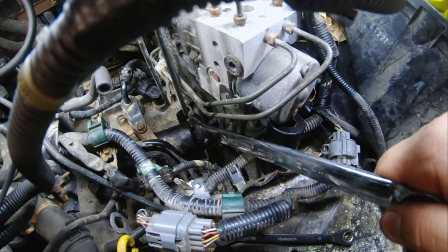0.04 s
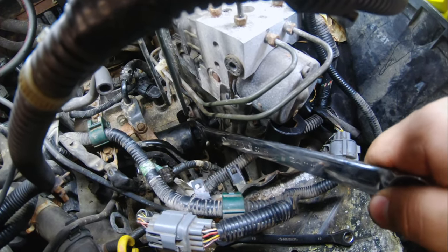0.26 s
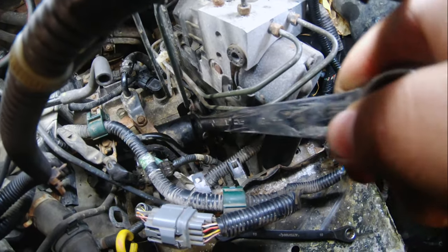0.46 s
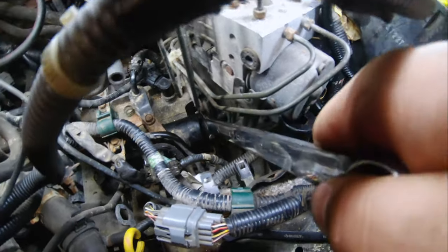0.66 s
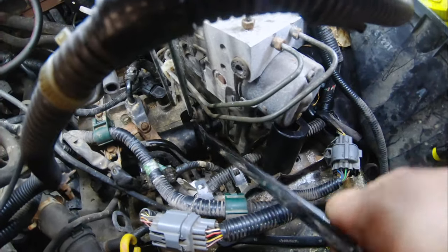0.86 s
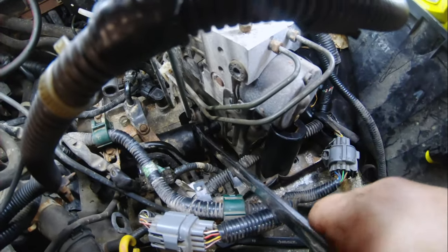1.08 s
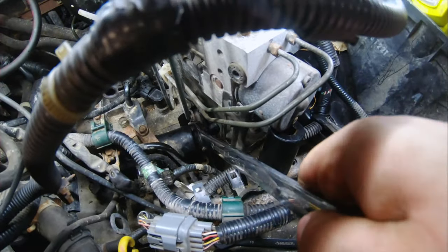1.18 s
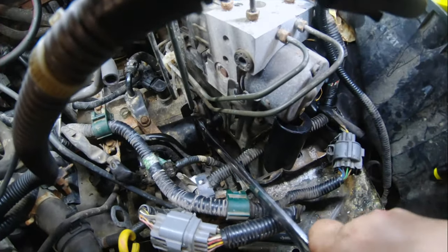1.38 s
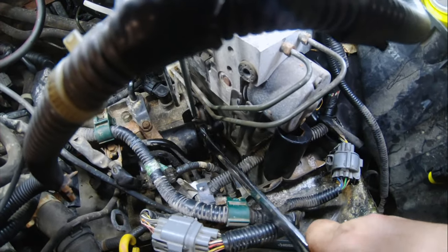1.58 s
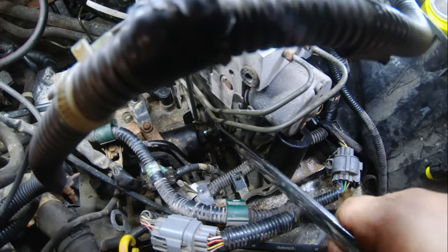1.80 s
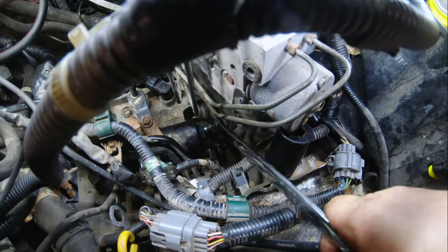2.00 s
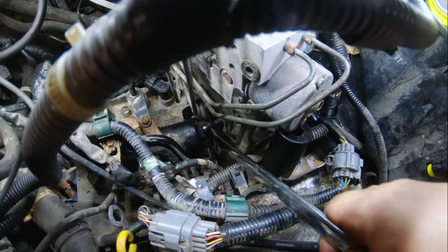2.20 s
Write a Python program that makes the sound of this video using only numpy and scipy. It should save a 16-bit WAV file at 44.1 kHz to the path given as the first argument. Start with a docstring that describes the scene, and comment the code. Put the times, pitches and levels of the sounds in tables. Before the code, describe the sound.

A wrench works a nut in a cramped engine bay, close up. Dry clicks at 0.2 and 0.3 s, a faint tick at 0.5. At 0.57-0.71 a hand bumps and rubs the microphone: deep thump, two loud hollow taps. Short scrape and double clack with dull knock around 1.0; rattling clack at 1.4, faint taps after. Brightest ringing clatter at 1.8-1.95, then quiet air and a faint tick near 2.17.

```python
"""Wrench on a nut in a cramped engine bay

A steel wrench clicks, clatters and slides on a nut: contacts are damped noise bursts, sliding is grainy noise.
Some blows ring the wrench or a metal pipe, or thud into panels: these are sums of decaying sine modes.
A hand bumps, rubs and taps the hand-held microphone, over low rumble, quiet air and a dying earlier clank.
The bay adds a short tail and the space around it a faint long one, both by convolution with decaying noise."""
import sys
import numpy as np
from scipy import signal
from scipy.fft import rfft, irfft
from scipy.io import wavfile
from scipy.ndimage import uniform_filter1d

SR = 44100
rng = np.random.default_rng(int(sys.argv[2]) if len(sys.argv) > 2 else 0)


def log_audio(samples):
    """Write samples as a 16-bit WAV file to the path given in sys.argv[1]."""
    # one column per channel
    frames = np.atleast_2d(samples).T
    # limit to full scale, then quantise
    limited = np.clip(frames, -1, 1)
    pcm = np.round(limited * 32767).astype(np.int16)
    wavfile.write(sys.argv[1], SR, pcm)


N = 99225
TIME = np.arange(N) / SR

# Spectrum of the quiet air: (frequency [Hz], relative level [dB])
AIR_TONE = [(18, -26), (30, -14), (319, -7), (486, -15), (2120, -13), (8520, -27.5), (16000, -43.5)]
# Reflections in the engine bay: (frequency [Hz], level [dB], T60 [s])
BAY_TAIL = [(155, -12.5, 0.16), (650, -2.5, 0.24), (2000, -9, 0.098), (10300, -8, 0.096)]
# Reflections in the space around it: (frequency [Hz], level [dB], T60 [s])
SPACE_TAIL = [(150, -19, 0.81), (600, -19, 0.62), (1985, -17, 0.57), (9000, -19, 0.53)]
# Course of the handling rumble before panning: (time [s], level [dB])
RUMBLE_LEVEL = [(.1, -86), (.48, -76), (.55, -38.5), (.583, -24.5), (.61, -35), (.73, -38), (.8, -53),
                (.93, -65), (1.34, -75), (1.41, -36), (1.55, -59.5), (1.66, -75.5)]
# Spectrum of the rumble: (frequency [Hz], relative level [dB])
RUMBLE_TONE = [(20, -2.5), (45, 1.5), (90, -2.5), (220, -12), (900, -48), (3000, -88)]
# The hand bumps the microphone as it lands and as it leaves: (time [s], level [dB])
BUMPS = [(0.5727, -6), (0.712, -36)]
# Skin rubbing the microphone, before grain and panning: (time [s], level [dB])
RUB_LEVEL = [(.556, -42), (.563, -40), (.569, -45), (.573, -26), (.579, -40), (.585, -31), (.591, -15.5),
             (.601, -20), (.613, -26.5), (.706, -28), (.738, -39.5), (.755, -61)]
# Spectrum of the rubbing: (frequency [Hz], relative level [dB])
RUB_TONE = [(180, -60), (300, -18), (978, -18), (1610, -3.5), (2700, -15.5), (3130, -12), (8090, -9),
            (14200, -37.5), (16000, -71)]
# Taps that ring the microphone port:
# (time [s], level [dB], frequency [Hz], T60 [s], snap relative to level [dB])
PORT_TAPS = [(.612, -1.5, 1534, 0.03, -23), (0.7104, -1.5, 1500, 0.035, -9.5)]
# Spectrum of the snap in a tap: (frequency [Hz], relative level [dB])
SNAP_TONE = [(300, -22), (900, -19), (2200, -0.5), (4800, -13), (12000, -51)]
# The jaw sliding into place: (time [s], duration [s], level [dB])
SCRAPES = [(0.956, 0.058, -43.5), (1.311, 0.17, -50), (1.758, .04, -52.5)]
# Spectrum of sliding steel: (frequency [Hz], relative level [dB])
SCRAPE_TONE = [(100, -21.5), (700, 1), (2000, 5), (2800, -1.5), (9500, -18), (12000, -37.5)]
# Modes of the wrench: (frequency [Hz], relative level [dB], T60 [s])
WRENCH_MODES = [(3084, -3, .04), (3780, -2, .045), (4345, -1, .04), (6070, -4, .055), (6150, 0, .035),
                (8985, -15, .12), (10590, -19, .03), (11950, -33, .09), (14250, -31, .06)]
# Modes of the pipe: (frequency [Hz], relative level [dB], T60 [s])
PIPE_MODES = [(630.6, 0, 0.61), (1064, -5, 0.37), (2012, -1, 0.17), (3025, -6, .24)]
# Modes of a panel: (multiple of the pitch, relative level [dB], T60 before the length factor [s])
PANEL_MODES = [(1, 3.5, 0.18), (1.16, -1, 0.21), (2.17, -5.5, 0.073), (3.35, -3, 0.078)]
# Blows that ring the free wrench: (time [s], level [dB])
WRENCH_BLOWS = [(1.7906, -15.5), (1.846, -22.5)]
# Blows that ring the pipe: (time [s], level [dB])
PIPE_BLOWS = [(1.846, -28.5)]
# Short pings of the jaw and the parts it strikes: (time [s], level [dB], frequency [Hz], T60 [s])
PINGS = [(0.1549, -36, 2830, 0.035), (.206, -18.5, 1998, 0.022), (.206, -16, 3230, 0.015),
         (0.2175, -27, 2890, 0.054), (0.3079, -9.5, 1886, 0.017), (.515, -27.5, 5780, 0.028),
         (.984, -17.5, 624, 0.049), (.987, -16.5, 2802, 0.035), (1.0043, -14, 2724, 0.025),
         (1.3935, -21.5, 3715, 0.049), (1.845, -10, 3380, 0.015), (1.892, -17.5, 3135, 0.052),
         (1.915, -13.5, 4030, 0.01), (1.9244, -17, 3310, 0.015)]
# Dull blows into panels and hoses: (time [s], level [dB], pitch [Hz], length factor)
THUDS = [(1.0052, -22.5, 300.4, 0.7), (1.03, -28, 121.7, 0.62), (1.413, -26.5, 294.3, 0.53),
         (1.468, -32.5, 258.4, 0.79), (1.565, -37, 320, 0.27), (1.606, -40, 314, 0.27),
         (1.678, -58, 259, 1.24), (1.848, -17.5, 184, 0.38), (1.894, -28, 186.5, 1.2),
         (2.17, -48, 209.5, 2.7)]
# Contacts of the wrench:
# (time [s], bass [dB], low mids [dB], mids [dB], presence [dB], treble [dB], length factor)
CLICKS = [ (.154, -64, -50, -42.5, -61, -58, 1.17), (0.2057, -50.5, -38.5, -24, -27, -35, 1.2),
          (0.2173, -56.5, -38.5, -37.5, -40, -42, 0.96), (0.306, -44.5, -36, -23, -29.5, -31.5, 0.84),
          (.442, -56, -46, -37, -52, -60.5, 1.42), (0.5145, -47.5, -68, -43.5, -39.5, -35, 0.92),
          (.521, -40, -35.5, -34.5, -55, -73.5, 0.51), (.901, -54, -45, -37.5, -39.5, -54.5, 0.65),
          (.983, -33.5, -24, -31, -27.5, -31.5, 0.38), (.9878, -49, -29, -22.5, -38, -23, 1.13),
          (1.004, -30.5, -25.5, -27.5, -29.5, -41, 0.83), (1.383, -41.5, -41.5, -34, -36, -42.5, 1.7),
          (1.3923, -34, -25.5, -25.5, -23, -37, 0.66), (1.401, -38, -26.5, -26, -28, -39.5, 1.72),
          (1.413, -34, -28.5, -39, -29, -44, 1.23), (1.458, -48, -50.5, -48.5, -48.5, -56.5, 5.6),
          (1.581, -53, -47.5, -47, -50, -54, 0.75), (1.66, -62, -59, -72.5, -57, -65, 0.83),
          (1.791, -59, -37.5, -32.5, -25, -30.5, 1.8), (1.844, -30.5, -41.5, -23.5, -26, -24, 0.91),
          (1.849, -38.5, -30, -25.5, -30.5, -27, 1.55), (1.8923, -41.5, -31.5, -28.5, -28, -28, 2.5),
          (1.914, -43.5, -45, -40, -29, -53, 1.7), (1.9235, -49, -36, -32, -30, -34.5, 3.1),
          (1.938, -40, -73, -30.5, -33.5, -38, 3), (2.163, -77, -52.5, -60, -58, -58.5, 1.5)]
# Bands of a click: (low edge [Hz], T60 before the length factor [s], left-right likeness)
CLICK_BANDS = [(118, 0.056, 0.99), (353, 0.055, 0.58), (1264, 0.033, 0.43), (2535, 0.027, 0.7),
               (4750, 0.034, 0.015)]
# Resonances of nut and jaw that colour every click: (frequency [Hz], width [Hz], gain [dB])
JAW_RESONANCES = [(686, 84, 6.5), (1926, 490, 7), (3286, 1440, 9.5), (7060, 850, 5.5), (9790, 720, 6.5)]

AIR_DB = -67
FADING_DB, FADING_DB_PER_S = -61, 141  # starting level and rate of decay
SHAKE_DB, SHAKE_S = -38.5, 0.035  # rumble excited by blows, and its smoothing time
BUMP_HZ, BUMP_T60_S, BUMP_RISE_S, BUMP_LEFT_DB = 41.8, 0.24, 0.0081, -14.5  # final pitch
BUMP_GLIDE, BUMP_GLIDE_S = 1.5, 0.0087  # starting excess of pitch (share), time constant
RUB_LEFT_DB, RUB_RIGHT_DB, RUB_GRAIN_DB = -8.5, -3, 2
PORT_LEFT_DB = -3.5
THUMP_HZ, THUMP_DB, THUMP_T60_S = 216, -17, 0.034  # low part of a tap, level relative to the tap
# Shifting contact bends the pitch: rms share of each mode's frequency, and length of averaging
WRENCH_WAVER, PIPE_WAVER, PING_WAVER, PANEL_WAVER = 0.0037, 0.0016, 0.012, 0.053
WAVER_S = 0.0067
TREBLE_EDGE_HZ, TOP_DB = 9690, -25.5  # level left above the edge
ATTACK_S, LEVEL_S = 0.00053, 0.0063  # base rise time; opening span that sets the click level
RIPPLE_DB, RIPPLE_HZ = 4, 201.7  # spread and spacing of random peaks
TOOL_LEFT_DB = -1  # left minus right
RING_SPACE_DB = -2.5  # small ringing parts carry less far than the blows
LIMIT_DB, LIMIT_SHARE, RECOVER_DB_PER_S = -24, 0.4, 26.5  # share of the excess level removed
CUTOFF_HZ = 16000


def amp(db):
    """Logarithmic level: converts decibels to an amplitude ratio."""
    return 10 ** (np.asarray(db) / 20)


def unit(x):
    """Power normalisation: scales to an rms of one."""
    return x / np.sqrt(np.mean(x ** 2) + 1e-20)


def curve(points):
    """Linear interpolation: a control curve at every sample."""
    return np.interp(TIME, *np.transpose(points))


def read(points, hz, axis=1):
    """Logarithmic frequency scale: interpolates a table column at the given frequencies."""
    table = np.array(points, float)
    return np.interp(np.log(hz + 1), np.log(table[:, 0] + 1), table[:, axis])


def add(mix, start_s, sound):
    """Superposition: adds a sound to the mix at a given time."""
    part = mix[:, max(round(start_s * SR), 0):][:, :sound.shape[-1]]
    part += sound[..., :part.shape[1]]


def pair(z, same):
    """Interchannel correlation: sum and difference make two unrelated signals partly alike."""
    likeness = np.clip(same, -1, 1)
    common = np.sqrt((1 + likeness) / 2) * z[0]
    opposed = np.sqrt((1 - likeness) / 2) * z[1]
    return common + np.array([[1], [-1]]) * opposed


def noise(tone, same=0.46, size=N):
    """Spectral shaping: stereo noise of a given spectrum and left-right likeness."""
    gain = amp(read(tone, np.fft.rfftfreq(size, 1 / SR)))
    shaped = irfft(rfft(rng.standard_normal((2, size))) * gain, size)
    return unit(pair(shaped, same))


def ring(modes, rise_s, waver=0):
    """Modal decay: damped sines of wavering pitch; high ones differ in phase between channels."""
    t, out = TIME[:SR], 0
    for hz, db, t60 in modes:
        phase = 2 * np.pi * rng.random() + np.array([[1], [-1]]) * min(hz / 7000, 1) ** 2
        bend = waver * unit(uniform_filter1d(rng.standard_normal(SR), int(WAVER_S * SR)))
        angle = 2 * np.pi * hz * np.cumsum(1 + bend) / SR
        out = out + amp(db - 60 * t / t60) * np.sin(angle + phase)
    return out * (1 - np.exp(-t / rise_s))


def air():
    """Stationary background noise: quiet air with a fixed spectrum."""
    return amp(AIR_DB) * noise(AIR_TONE, same=0.3)


def fading_clank():
    """Exponential decay: the noisy end of an earlier clank dies away."""
    return noise(SCRAPE_TONE) * amp(FADING_DB - FADING_DB_PER_S * TIME)


def tail(x, bands, delay_s):
    """Diffuse reverberation: convolution with noise whose level and decay vary with frequency."""
    diffuse = pair(rng.standard_normal((2, SR)), 0.97)
    hz, t, z = signal.stft(diffuse, SR, nperseg=256)
    t60 = read(bands, hz, axis=2)[:, None]
    decay = amp(read(bands, hz)[:, None] - 60 * t / t60)
    z = z * decay * np.sqrt(2 * np.log(1000) / (t60 * SR))  # energy independent of T60
    build_up = np.minimum(TIME[:SR] / delay_s, 1) ** 2
    echo = signal.istft(z, SR, nperseg=256)[1][:, :SR] * build_up
    return signal.fftconvolve(x, echo, axes=1)[:, :N]


def rumble(tool):
    """Structure-borne vibration: low handling noise that swells as blows shake the microphone."""
    k = 1 / (SHAKE_S * SR)
    shake = np.sqrt(signal.lfilter([k], [1, k - 1], (tool ** 2).mean(0)))
    level = amp(curve(RUMBLE_LEVEL)) + amp(SHAKE_DB) * shake
    return noise(RUMBLE_TONE, same=1.0) * level * amp([[-4], [2]])


def rubbing():
    """Stick-slip friction: skin on the microphone makes noise of fluctuating level."""
    grain = unit(uniform_filter1d(rng.standard_normal(N), 90))
    touching = (TIME > RUB_LEVEL[0][0]) & (TIME < RUB_LEVEL[-1][0])
    level = touching * amp(curve(RUB_LEVEL) + RUB_GRAIN_DB * grain)
    return noise(RUB_TONE, same=0.021) * level * amp([[RUB_LEFT_DB], [RUB_RIGHT_DB]])


def bumps():
    """Damped low oscillation: each bump starts high and settles in pitch."""
    t, out = TIME[:SR], np.zeros((2, N))
    turns = BUMP_HZ * (t + BUMP_GLIDE * BUMP_GLIDE_S * (1 - np.exp(-t / BUMP_GLIDE_S)))
    envelope = amp(-60 * t / BUMP_T60_S) * (1 - np.exp(-(t / BUMP_RISE_S) ** 2))
    bump = -np.sin(2 * np.pi * turns) * envelope
    for s, db in BUMPS:
        add(out, s, amp(db) * bump * amp([[BUMP_LEFT_DB], [0]]))
    return out


def port_taps():
    """Cavity resonance: a tap rings the microphone port, with a noisy snap and a low thump."""
    t, out = TIME[:SR], np.zeros((2, N))
    for s, db, hz, t60, snap_db in PORT_TAPS:
        # opposite polarity in the two channels
        tone = ring([(hz, db, t60)], 0.000098) * np.array([[-amp(PORT_LEFT_DB)], [1]])
        envelope = amp(db + snap_db - 60 * t / 0.013) * (1 - np.exp(-t / 0.00037))
        snap = noise(SNAP_TONE, same=0.067, size=len(t)) * envelope
        thump = ring([(THUMP_HZ, db + THUMP_DB, THUMP_T60_S)], 0.0015)
        add(out, s, tone + snap + thump)
    return out


def scrapes():
    """Sliding friction: grainy noise as the jaw slides over the nut."""
    out = np.zeros((2, N))
    for s, duration, db in SCRAPES:
        size = int(duration * SR)
        grain = unit(uniform_filter1d(rng.exponential(1, N) ** 2, 60))[:size]
        slide = noise(SCRAPE_TONE)[:, :size] * grain * np.hanning(size) ** 0.36
        add(out, s, amp(db) * unit(slide))
    return out


def ringing():
    """Free vibration: wrench, pipe, jaw and panels sound their own modes after the blows."""
    out = np.zeros((2, N))
    for s, db in WRENCH_BLOWS:
        add(out, s, amp(db) * ring(WRENCH_MODES, 0.001, WRENCH_WAVER))
    for s, db in PIPE_BLOWS:
        add(out, s, amp(db) * ring(PIPE_MODES, 0.0042, PIPE_WAVER))
    for s, db, hz, t60 in PINGS:
        add(out, s, ring([(hz, db, t60)], 0.0004, PING_WAVER))
    for s, db, hz, length in THUDS:
        modes = [(hz * k, db + mode_db, t60 * length) for k, mode_db, t60 in PANEL_MODES]
        add(out, s, ring(modes, 0.0029, PANEL_WAVER))
    return out


def ripple(hz):
    """Point excitation: each contact favours other modes, as random peaks and valleys in dB."""
    knots = np.arange(0, SR / 2, RIPPLE_HZ)
    heights = rng.standard_normal(len(hz))[:len(knots)]
    return RIPPLE_DB * np.interp(hz, knots, heights)


def click_shapes(hz):
    """Resonant filtering: the spectrum of each click band, coloured by nut and jaw."""
    peaks_db = sum(db / (1 + (2 * (hz - f) / width) ** 2) for f, width, db in JAW_RESONANCES)
    colour = amp(peaks_db)
    edges = [band[0] for band in CLICK_BANDS]
    shapes = []
    for low, high in zip(edges, edges[1:]):
        shapes.append(colour / np.sqrt((1 + (low / hz) ** 12) * (1 + (hz / high) ** 12)))
    top_cut = amp(TOP_DB) + 1 / (1 + (hz / TREBLE_EDGE_HZ) ** 30)
    shapes.append(colour / np.sqrt(1 + (edges[-1] / hz) ** 12) * top_cut)
    return shapes


def clicks():
    """Impact excitation: each contact is a burst of dense, heavily damped modes."""
    t, out = TIME[:8192], np.zeros((2, N))
    hz = np.fft.rfftfreq(len(t), 1 / SR) + 1  # avoids division by zero
    shapes = click_shapes(hz)
    for s, *levels, length in CLICKS:
        contact = amp(ripple(hz))
        for db, shape, (edge_hz, t60, same) in zip(levels, shapes, CLICK_BANDS):
            spectrum = rfft(rng.standard_normal((2, len(t)))) * shape * contact
            burst = pair(irfft(spectrum), same)
            attack = 1 - np.exp(-t / (ATTACK_S + 0.5 / edge_hz))  # low bands rise more slowly
            burst *= attack * amp(-60 * t / (t60 * length))
            opening_rms = np.sqrt(np.mean(burst[:, :int(LEVEL_S * SR)] ** 2))
            add(out, s, amp(db) * burst / opening_rms)
    return out


def scene():
    """Superposition of tool sounds, their reflections, handling noise and quiet air."""
    pan = amp(TOOL_LEFT_DB * np.array([[0.5], [-0.5]]))
    contacts = pan * (clicks() + scrapes())
    rings = pan * ringing()
    tool = contacts + rings
    bay = tail(tool, BAY_TAIL, 0.005)
    space = tail(contacts + amp(RING_SPACE_DB) * rings, SPACE_TAIL, 0.018)
    handling = rubbing() + bumps() + port_taps()
    return tool + bay + space + handling + rumble(tool) + air() + fading_clank()


def record(dry):
    """Dynamic compression: gain falls after loud peaks and recovers; then a low-pass limits the band."""
    power_db = 10 * np.log10(abs(uniform_filter1d((dry ** 2).mean(0), 200)) + 1e-12)
    fall = TIME * RECOVER_DB_PER_S
    held_db = np.maximum.accumulate(power_db + fall) - fall  # peak level with a steady release
    over_db = np.maximum(held_db - LIMIT_DB, 0)
    smooth_db = signal.lfilter([1 / 400], [1, 1 / 400 - 1], over_db)
    ducked = dry * amp(-LIMIT_SHARE * smooth_db)
    low_pass = signal.firwin(255, CUTOFF_HZ, window=("kaiser", 9), fs=SR)
    return signal.oaconvolve(ducked, low_pass[None], "same")


dry = scene()
out = record(dry)
log_audio(out)
```